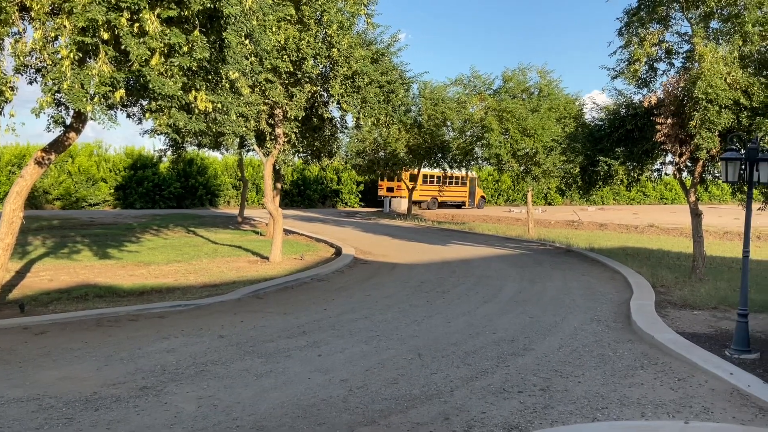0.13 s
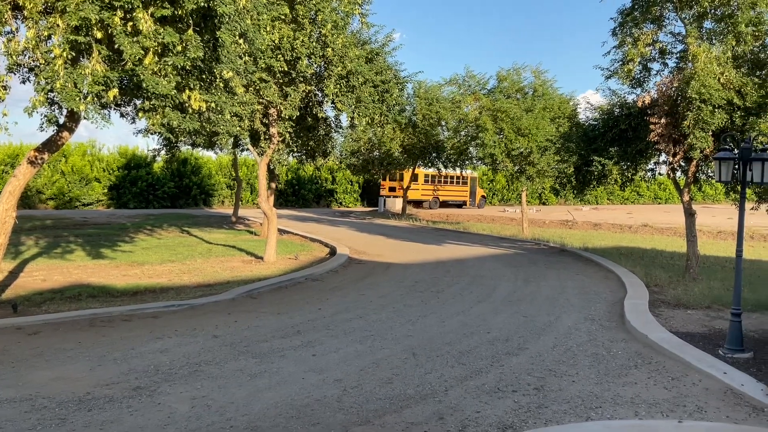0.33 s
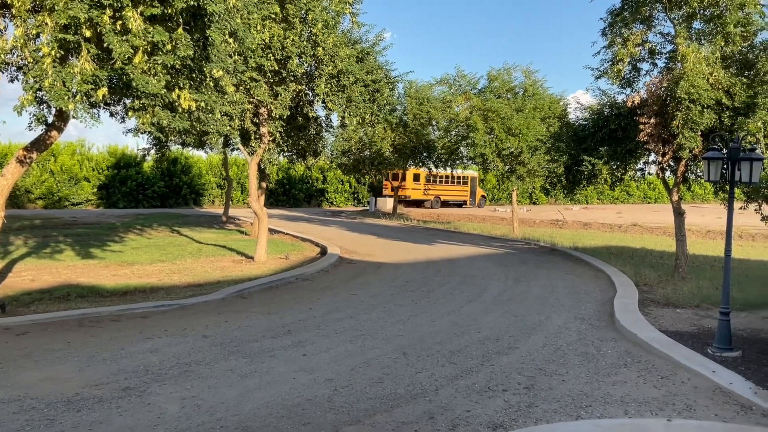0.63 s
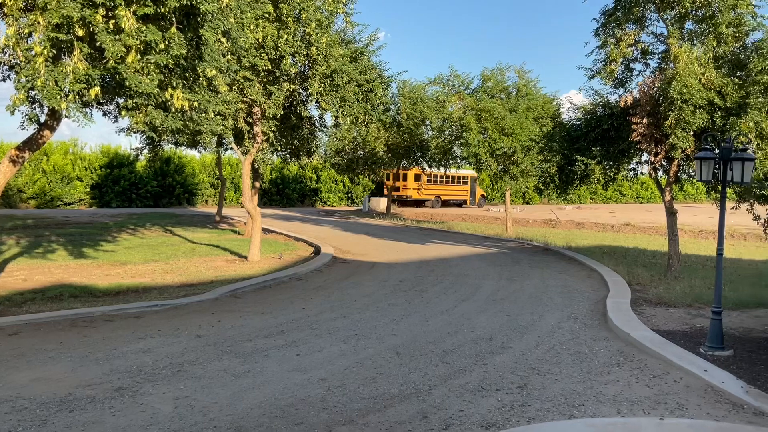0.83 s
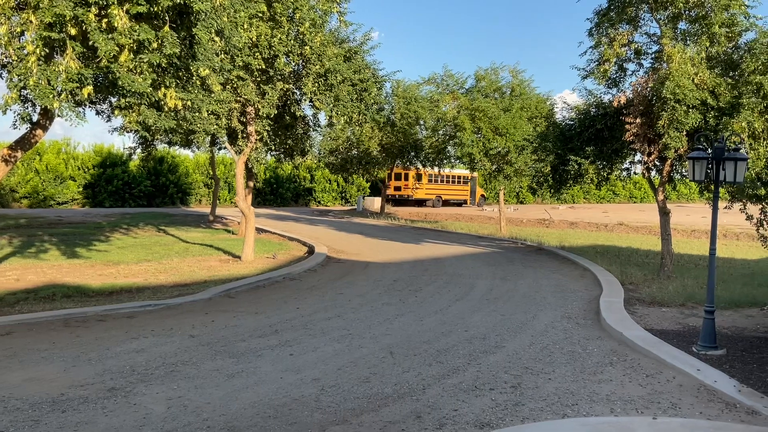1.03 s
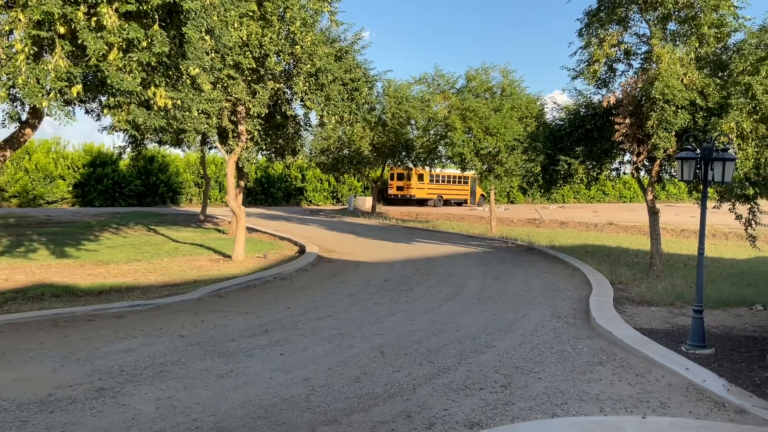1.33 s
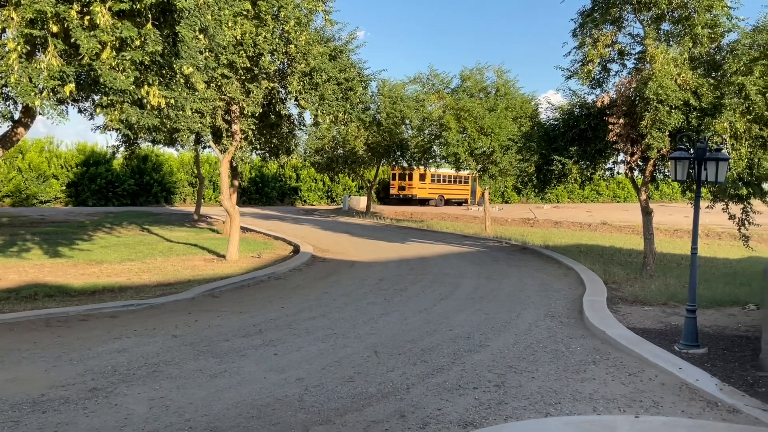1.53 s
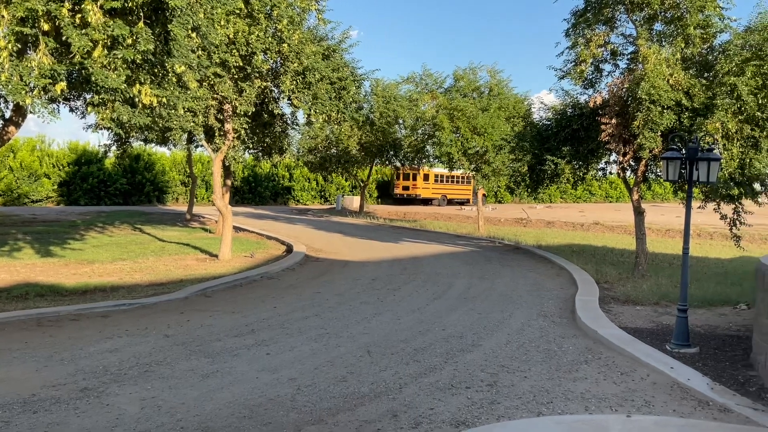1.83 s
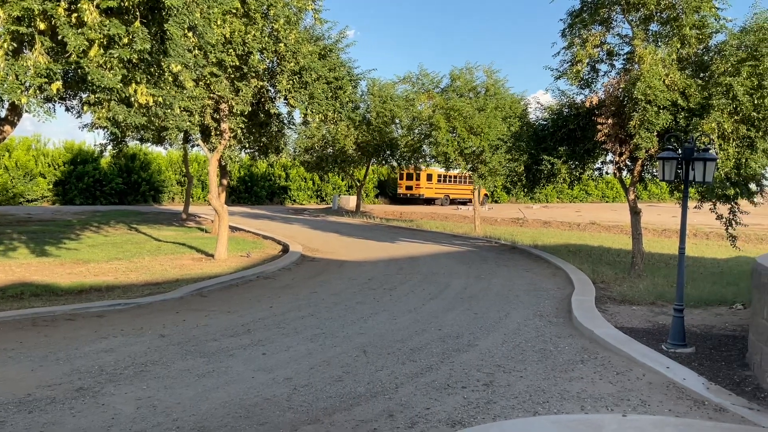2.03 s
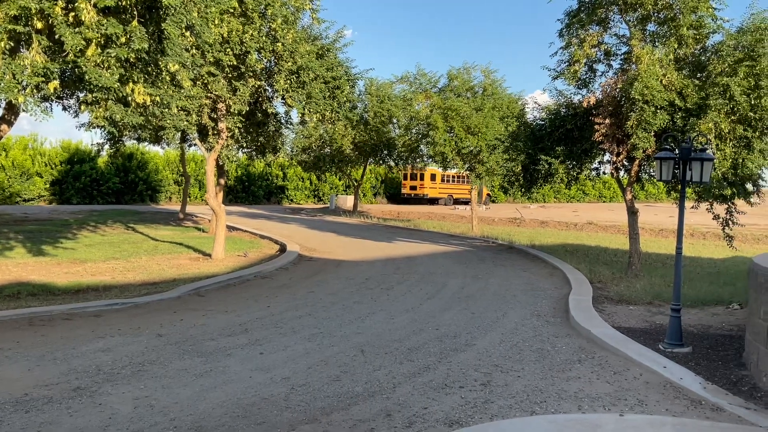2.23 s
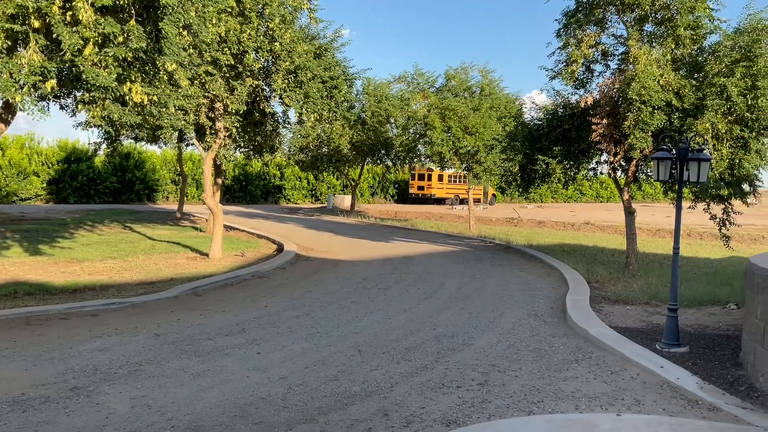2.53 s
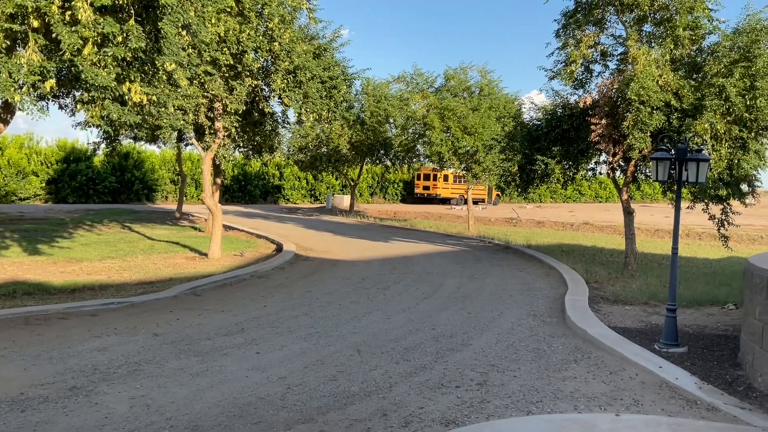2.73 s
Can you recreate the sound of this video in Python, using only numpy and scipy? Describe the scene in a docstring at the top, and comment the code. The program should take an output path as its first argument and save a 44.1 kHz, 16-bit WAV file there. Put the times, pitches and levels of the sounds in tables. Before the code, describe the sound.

A diesel bus drones some fifty metres off, revs creeping up, then falling to a low rumble, with soft tyre roar and tiny grit crackles, heard outdoors on a phone's stereo microphones.

```python
"""First the drone of a diesel bus pulling away some fifty metres off behind trees; then its revs fall.
With the firing tone and its orders, uneven sines, comes a wavering low hum near 100 Hz. Bands of noise make
the rumble, engine and tyre roar and leaves. A thin turbo whistle, faint swelling tones and short noise bursts
of grit lie on top. Two phone microphones pick it up with different delays and partly separate noise."""
import sys
import numpy as np
from scipy import signal
from scipy.fft import rfft, irfft
from scipy.io import wavfile
from scipy.ndimage import uniform_filter1d

SR = 44100
rng = np.random.default_rng(int(sys.argv[2]) if len(sys.argv) > 2 else 0)


def undo_db(level):
    """Turn decibels back into plain size, where 20 dB means ten times bigger."""
    steps = np.asarray(level, float) / 20
    return 10 ** steps


def generate_wav(signal):
    """Clip the signal to [-1, 1] and save it as 16-bit WAV at the path in sys.argv[1]."""
    frames = np.transpose(np.atleast_2d(signal))
    scaled = np.clip(frames, -1, 1) * 32767
    pcm = np.round(scaled).astype(np.int16)
    wavfile.write(sys.argv[1], SR, pcm)


N = 127008  # samples, 2.88 s

# Engine firing. Each row: time in seconds, firing rate in Hz, middle rms level of the firing tone in dB.
FIRING = [(0, 72.7, -32.5), (.1, 74.5, -26), (.22, 74.87, -27), (.34, 76.04, -25.5), (.45, 76.25, -27),
          (.6, 77.66, -32.5), (.68, 77.6, -31), (.77, 78.38, -29), (.92, 78.84, -46), (1.1, 79.1, -39),
          (1.22, 78.5, -36.5), (1.32, 77.8, -29.5), (1.47, 77.43, -30.5), (1.6, 75.08, -29.5),
          (1.78, 74.3, -28), (1.88, 73.34, -33.5), (1.98, 67.97, -38), (2.12, 60.98, -41.5),
          (2.3, 55.5, -39.5), (2.45, 50.54, -44.5), (2.6, 50.1, -50), (2.87, 48.95, -48.5)]
# Engine orders. Each row: multiple of the firing rate, rms level under throttle in dB, waver width in Hz.
ORDERS = [(.75, -52.5, 5.4), (1.5, -45.5, 4.89), (2, -50, 7.2), (2.5, -57, 9), (3.25, -58, 10),
          (4.25, -56, 8.6)]
# Low hum with a pitch apart from the revs. Each row: time in seconds, pitch in Hz, rms level in dB.
LOW_HUM = [(0, 99.6, -41.5), (.2, 100, -41.5), (.4, 101.1, -37.5), (.6, 101.9, -42), (.77, 101.1, -35),
           (.95, 98.4, -37.5), (1.1, 96.2, -47), (1.3, 96.47, -35), (1.48, 96.7, -35.5), (1.65, 96.7, -44),
           (1.85, 98.9, -33.5), (2.02, 99.5, -48.5), (2.2, 100.8, -34.5), (2.32, 100, -41),
           (2.45, 99.25, -38), (2.58, 100.2, -43), (2.74, 99.5, -37), (2.87, 92.3, -51)]
# Broad noise of the bus. Each row: time in seconds, levels of low rumble, mid roar and treble hiss in dB.
ROAR_LEVELS = [(0, -37.5, -45, -49), (.3, -40, -42.5, -47.5), (.6, -39, -43.5, -48), (.9, -39.5, -45, -48),
               (1.05, -37, -43.5, -49), (1.25, -40.5, -43, -52.5), (1.5, -38, -45.5, -51.5),
               (1.8, -41, -45.5, -53.5), (2.05, -37.5, -47, -53.5), (2.25, -38, -47.5, -59.5),
               (2.4, -40, -47, -59.5), (2.55, -38.5, -49, -58), (2.87, -41, -47.5, -58)]
# Colours of rumble, roar and hiss. Each row: frequency in Hz, relative level in dB per Hz.
RUMBLE_COLOUR = [(22, -46.5), (35, -17), (55, -8.5), (75, 2.5), (95, 0), (125, -6), (170, -10),
                 (260, -19.5), (400, -38.5)]
ROAR_COLOUR = [(120, -28), (200, -6), (330, -0.5), (450, -4.5), (560, -8.5), (630, -5.5), (900, -9),
               (1150, -8.5), (1500, -15.5), (2000, -16), (3000, -20)]
HISS_COLOUR = [(1200, -9.5), (1900, -1), (2900, 1), (3500, -4), (4200, -4.5), (5000, -9.5), (6000, -5),
               (7000, -8.5), (7600, -17), (8200, -20), (10000, -26.5), (11000, -38.5), (12500, -34),
               (13200, -41.5), (13800, -56.5)]
# Colour of leaves and distant air. Each row: frequency in Hz, relative level in dB per Hz.
LEAVES_COLOUR = [(1500, -20), (3000, -9.5), (4500, 3), (6500, 2), (7400, -10.5), (8000, -29), (9000, -28.5),
                 (11000, -42.5), (13500, -45), (14300, -58.5)]
# Turbo whistle. Each row: time in seconds, pitch in Hz, rms level in dB.
WHISTLE = [(0, 12940, -79.5), (.3, 12760, -84.5), (.6, 12930, -77), (.95, 13100, -84), (1.18, 13100, -82),
           (1.3, 12850, -80), (1.45, 12320, -80), (1.58, 11900, -77.5), (1.68, 11650, -77),
           (1.78, 11380, -75), (1.9, 11150, -77.5), (1.98, 10880, -79), (2.05, 10700, -99)]
# High orders that swell and fade. Each row: middle in seconds, length in seconds, multiple of the
# firing rate, level at the middle in dB.
WHINES = [(0.194, 0.72, 8.15, -54), (0.145, 0.38, 14.1, -57), (.6, 0.54, 3.29, -51.5),
          (.69, 0.28, 8.3, -53.5), (0.977, 1, 9.38, -51.5), (1.152, 0.73, 14.3, -58.5),
          (1.45, 0.7, 2.96, -53)]
# Swelling hums that hold their pitch. Each row: middle in seconds, length in seconds, pitch in Hz,
# level at the middle in dB.
HELD_HUMS = [(0.022, 0.2, 394.4, -43), (0.438, 0.33, 402, -52), (1.52, 0.5, 607, -55),
             (1.764, 0.31, 732, -56.5), (1.898, 0.22, 144.1, -52.5), (2.191, 0.16, 332, -50.5),
             (2.142, 1, 455, -58), (2.648, 0.58, 175.9, -50.5)]
# Grit under the tyres. Each row: start in seconds, level at the peak in dB.
GRIT_TICKS = [(1.174, -57), (1.226, -54.5), (1.338, -52), (1.407, -48.5), (1.44, -70.5), (1.57, -52.5),
              (1.82, -54), (1.907, -53), (1.989, -55.5), (2.292, -56.5), (2.4, -60), (2.449, -50),
              (2.618, -51.5)]
# Colour of the grit. Each row: frequency in Hz, relative level in dB per Hz.
GRIT_COLOUR = [(2000, -17.5), (3000, -1.5), (5000, 0), (7000, 0), (8500, -10.5), (9800, -22), (11300, -27),
               (14000, -47)]
# Delay between the microphones. Each row: frequency in Hz, phase lead of the right one in radians.
RIGHT_LEAD = [(150, -0.0448), (350, 0.24), (600, 0.48), (800, 0.1), (1100, -1), (1300, 0.4), (1600, 1.29),
              (2000, 2), (2400, 3), (2900, 5.0), (3450, 6.5), (4200, 6.5), (4350, 6.5), (5000, 6.5),
              (6200, 7.5), (7500, 7.5), (8400, 10), (10500, 9.5), (10900, 11.2), (11700, 11.3),
              (12400, 11.3), (13300, 13.5)]
# Likeness of the microphones. Each row: frequency in Hz, shared part of the noise power (0-1).
SHARED_NOISE = [(100, 1), (200, 0.91), (350, 0.7), (700, 0.64), (1300, 0.78), (1800, 0.96), (3300, 0.95),
                (3450, 0.96), (4200, .999), (4400, 0.82), (7000, 0.95), (7800, 0.65), (8600, 0.99),
                (10900, 1), (12000, .7)]


def col(table, index):
    """A table column joined by lines over time."""
    rows = np.array(table, float)
    return np.interp(np.arange(N) / SR, rows[:, 0], rows[:, index])


def over_hz(table, size=N):
    """A (Hz, value) table on the FFT bins, joined by lines over log frequency."""
    rows = np.array(table, float)
    bin_hz = np.arange(size // 2 + 1) * SR / size
    return np.interp(np.log(bin_hz + 1), np.log(rows[:, 0]), rows[:, 1])


def unit(x):
    """Scaled to rms 1."""
    return x / np.sqrt(np.mean(x ** 2))


def walk(rate):
    """Random values, rate of them a second, slewed twice by a moving average; spread near 1."""
    hold = int(SR / rate)
    steps = np.repeat(rng.standard_normal(N // hold + 1), hold)
    smooth = uniform_filter1d(uniform_filter1d(steps, hold), hold)
    return 1.3 * smooth[:N]


def noise(colour, flicker_db, flicker_rate, shared_db):
    """Coloured noise in half-octave bands that flicker alone and together; rows: shared, left only, right only."""
    spec = rfft(rng.standard_normal((3, N))) * undo_db(over_hz(colour))
    half_octave = np.log2((np.arange(N // 2 + 1) * SR / N + 1) / 20) * 2  # counted up from 20 Hz
    lowest, highest = (int(2 * np.log2(colour[k][0] / 20)) for k in (0, -1))
    out, shared = 0, shared_db * walk(flicker_rate)
    for band in range(lowest, highest + 2):
        window = np.cos(np.pi / 2 * np.clip(half_octave - band, -1, 1)) ** 2  # neighbours add up to 1
        part = irfft(spec * window, N)
        out = out + part * undo_db(flicker_db * walk(flicker_rate) + shared)
    return unit(out)


def tone(hz, width_hz, waver=.5):
    """A tone of rms 1 whose strength and phase waver at random, width_hz steps a second."""
    wobble = walk(width_hz) + 1j * walk(width_hz)
    turns = np.cumsum(hz) / SR + rng.random()
    return unit(np.imag((1 + waver * wobble) * np.exp(2j * np.pi * turns)))


def engine():
    """Firing tone and its orders on one unevenly running phase; the orders sink off throttle."""
    jitter, scatter_db = 0.0055, 1  # jitter as a fraction of the firing rate
    throttle_off_s, throttle_fade_s, coasting_db = 1.87, 0.25, -4
    hz = col(FIRING, index=1) * (1 + jitter * walk(12.07))
    phase = 2 * np.pi * np.cumsum(hz) / SR
    level = undo_db(col(FIRING, index=2) + scatter_db * walk(25.04))
    out = np.sqrt(2) * level * np.sin(phase + 2 * np.pi * rng.random())
    off_throttle = np.clip((np.arange(N) / SR - throttle_off_s) / throttle_fade_s, 0, 1)
    load = undo_db(coasting_db * off_throttle)
    for multiple, db, width_hz in ORDERS:
        out = out + load * undo_db(db) * tone(multiple * hz, width_hz, waver=0.78)
    return out, phase


def low_hum():
    """A gently wavering tone near 100 Hz that does not follow the revs."""
    return undo_db(col(LOW_HUM, index=2)) * tone(col(LOW_HUM, index=1), 3.114, waver=0.11)


def roar(phase):
    """Low rumble, then engine roar and fan and tyre hiss that both puff at half the firing rate."""
    puff = 1 + 0.055 * np.sin(phase / 2)
    rumble = undo_db(col(ROAR_LEVELS, index=1)) * noise(RUMBLE_COLOUR, 0.94, 7.86, 0.69)
    mid = undo_db(col(ROAR_LEVELS, index=2)) * puff * noise(ROAR_COLOUR, .8, 8.27, 0.5)
    hiss = undo_db(col(ROAR_LEVELS, index=3)) * puff * noise(HISS_COLOUR, 1.1, 10.04, 1.0)
    return rumble + mid + hiss


def leaves():
    """Leaves and distant air: faint flickering noise with no trend, under the bus throughout."""
    return undo_db(-63) * noise(LEAVES_COLOUR, 1.3, 5.1, .8)


def turbo():
    """Thin high whistle, a broadly wavering tone that sinks in the second half and stops."""
    on = np.clip((WHISTLE[-1][0] - np.arange(N) / SR) / .05, 0, 1)  # closes over the last 50 ms
    return on * undo_db(col(WHISTLE, index=2)) * tone(col(WHISTLE, index=1), 680, waver=2.1)


def swelling_tones():
    """Faint tones that swell and fade as half a cosine: some ride on the revs, some hold their pitch."""
    t, firing_hz = np.arange(N) / SR, col(FIRING, index=1)
    rows = [(middle, length, multiple * firing_hz, db) for middle, length, multiple, db in WHINES]
    rows += [(middle, length, np.full(N, float(hz)), db) for middle, length, hz, db in HELD_HUMS]
    out = 0
    for middle, length, hz, db in rows:
        swell = np.cos(np.pi * np.clip((t - middle) / length, -.5, .5))
        out = out + undo_db(db) * swell * tone(hz, 8.904, waver=0.45)
    return out


def grit():
    """Short soft noise bursts of grit under the tyres: a straight rise, then exponential decay."""
    rise_s, decay_s = 0.006, 0.014
    t, envelope = np.arange(N) / SR, 0
    for start, db in GRIT_TICKS:
        since_peak = t - start - rise_s
        rise = np.clip(1 + since_peak / rise_s, 0, 1)
        decay = np.exp(-np.abs(since_peak) / decay_s)
        envelope = envelope + undo_db(db) * np.where(since_peak < 0, rise, decay)
    return envelope * noise(GRIT_COLOUR, 0.13, 30, .1)


def microphones(tones, noises):
    """Tones reach both phone microphones, noise is partly their own; phase sets their delays."""
    rows = np.vstack([tones, noises])
    edge = 4096  # samples of smooth run-in and run-out, cut off again at the end
    fade = np.hanning(2 * edge)
    rows = np.pad(rows, ((0, 0), (edge, edge)), "reflect", reflect_type="odd")
    size = N + 2 * edge
    spec = rfft(rows * np.r_[fade[:edge], np.ones(N), fade[edge:]])
    alike = np.clip(over_hz(SHARED_NOISE, size=size), 0, 1)
    both = spec[0] + np.sqrt(alike) * spec[1] + np.sqrt(1 - alike) * spec[2:]
    half_lead = .5 * over_hz(RIGHT_LEAD, size=size) * np.array([[-1], [1]])  # left, right
    return irfft(both * np.exp(1j * half_lead), size)[:, edge:-edge]


def scene():
    """The bus and the leaves as the two microphones pick them up."""
    firing, phase = engine()
    tones = firing + low_hum() + turbo() + swelling_tones()
    noises = roar(phase) + leaves() + grit()
    return microphones(tones, noises)


def low_pass(x):
    """Removes everything above the highest recorded frequency."""
    return signal.sosfilt(signal.butter(12, 14400, fs=SR, output="sos"), x)


def record(dry):
    """The finished stereo mix as it is kept."""
    return low_pass(dry)


dry = scene()
out = record(dry)
generate_wav(out)
```